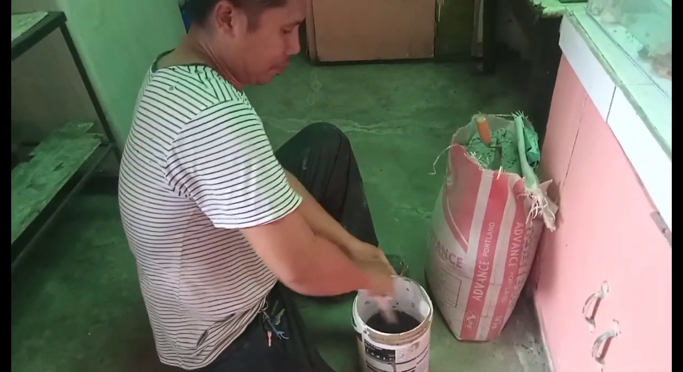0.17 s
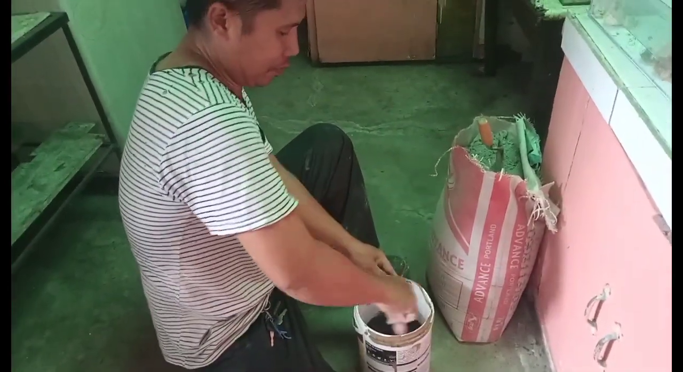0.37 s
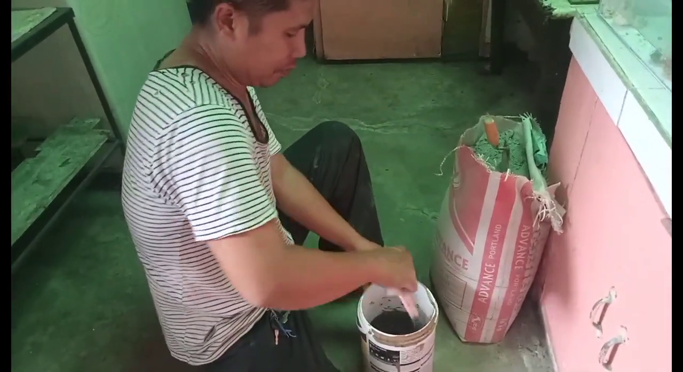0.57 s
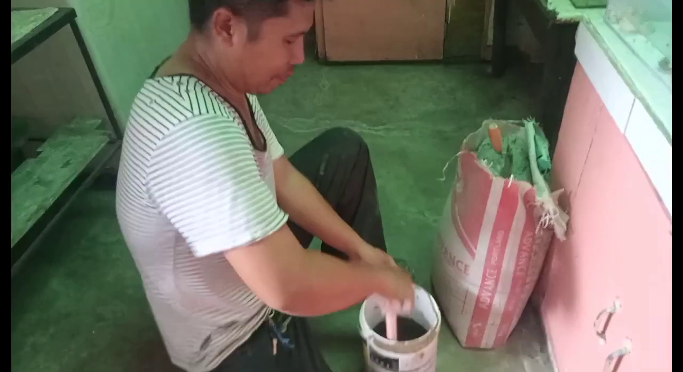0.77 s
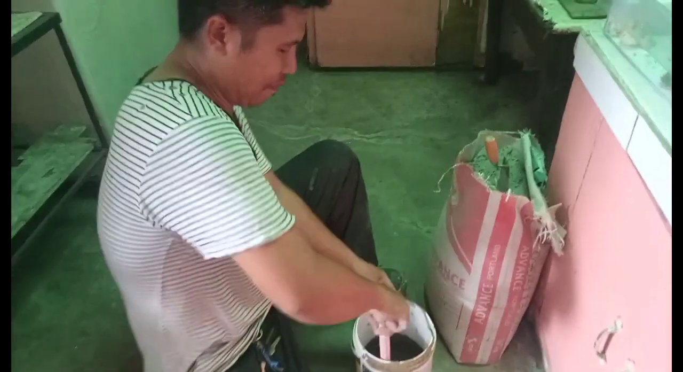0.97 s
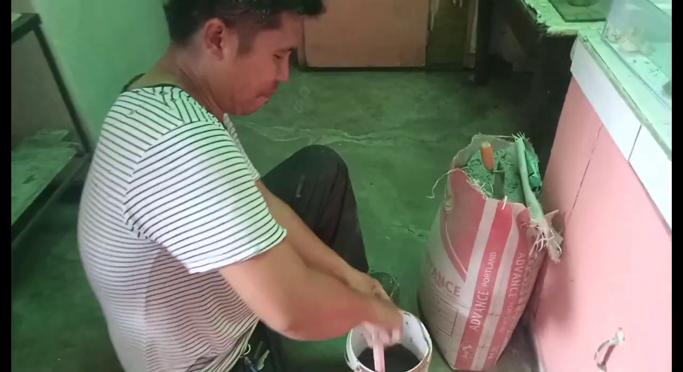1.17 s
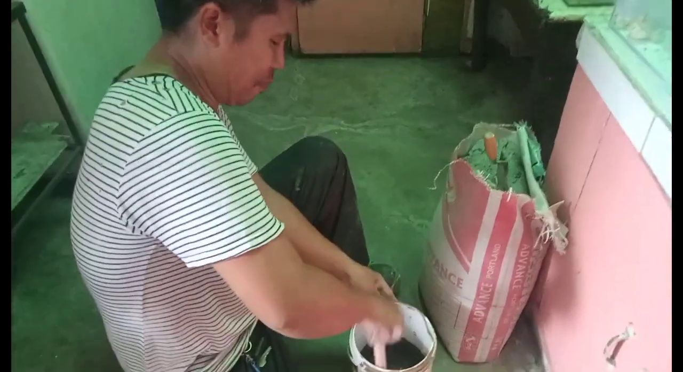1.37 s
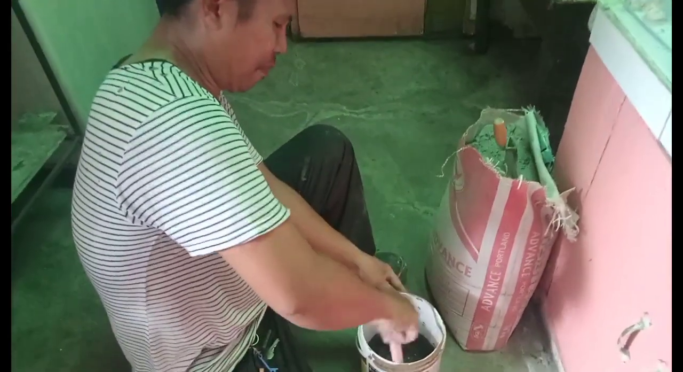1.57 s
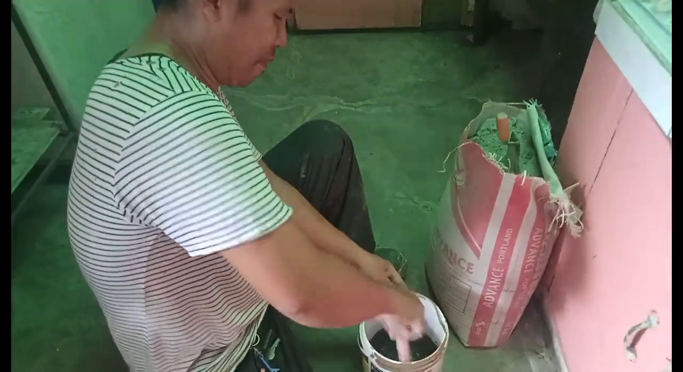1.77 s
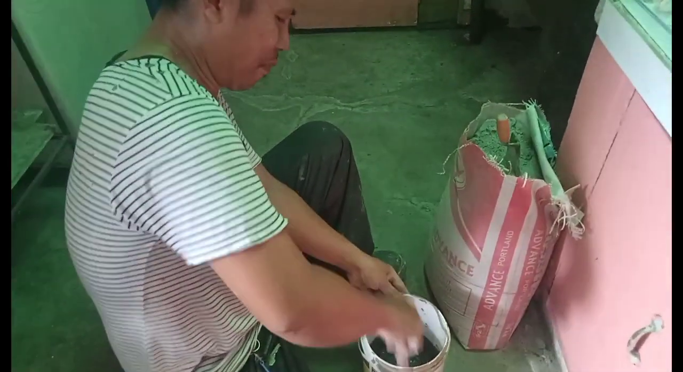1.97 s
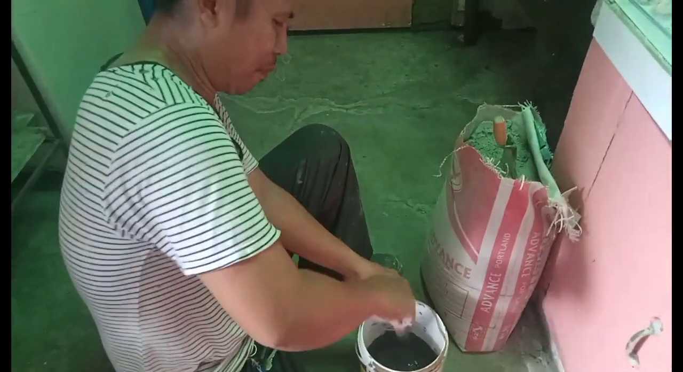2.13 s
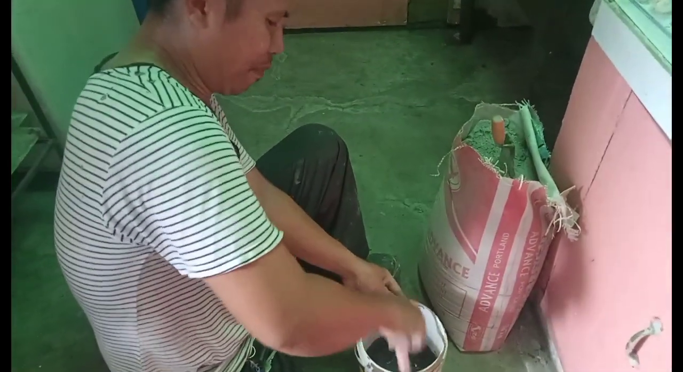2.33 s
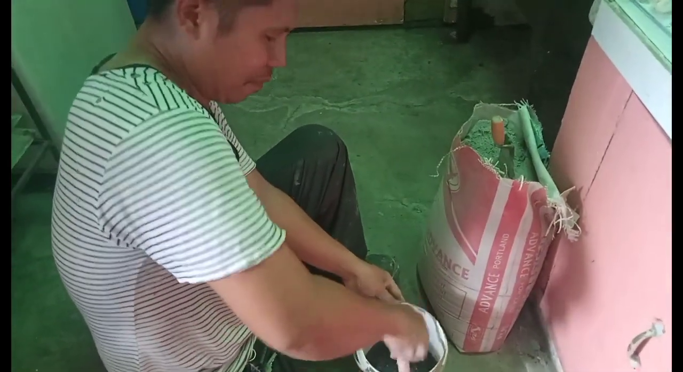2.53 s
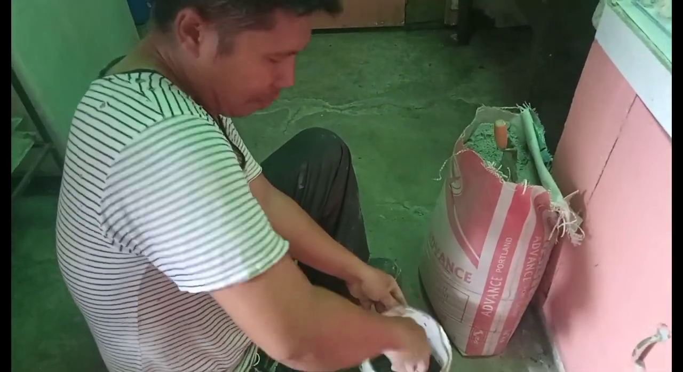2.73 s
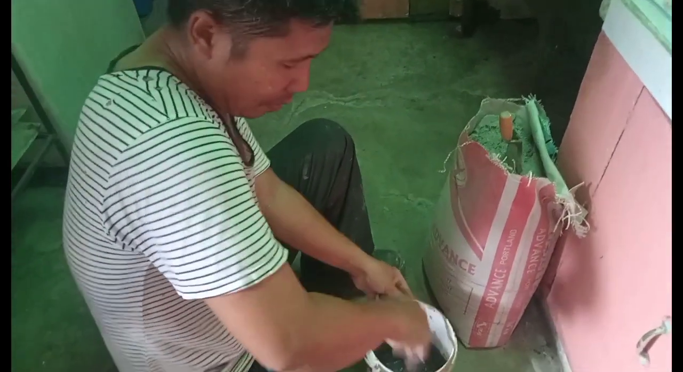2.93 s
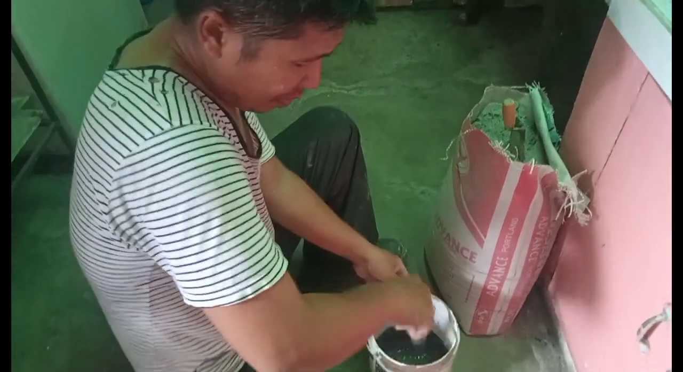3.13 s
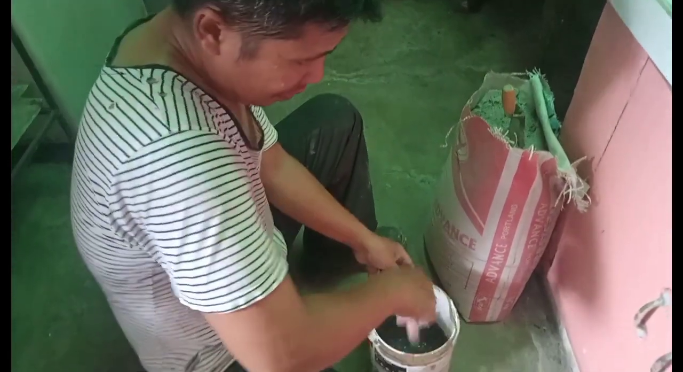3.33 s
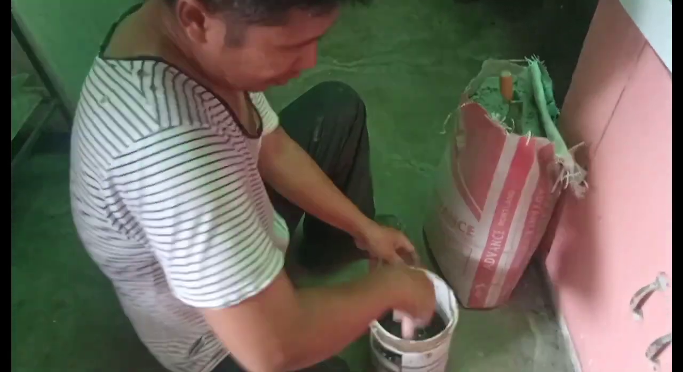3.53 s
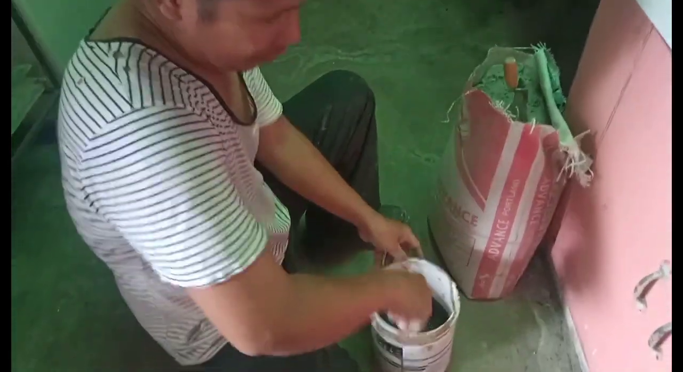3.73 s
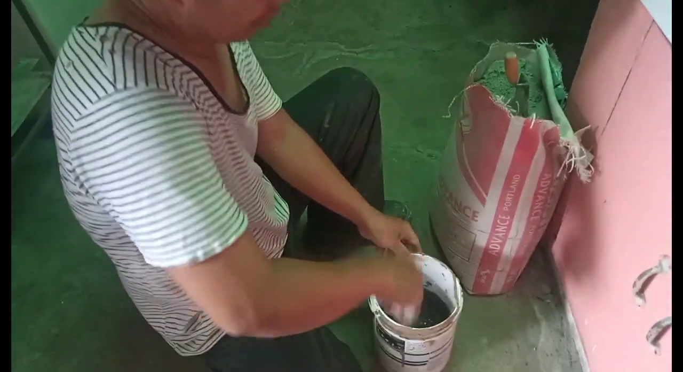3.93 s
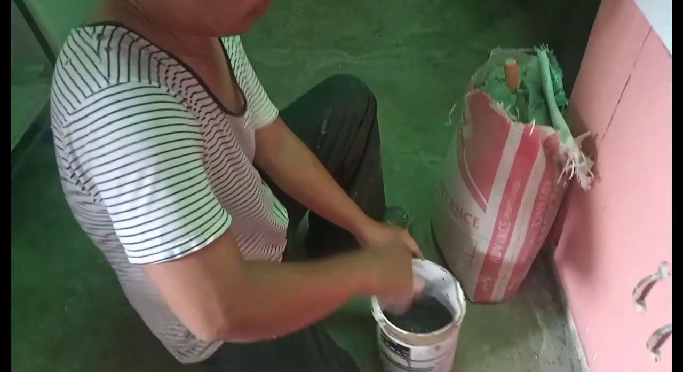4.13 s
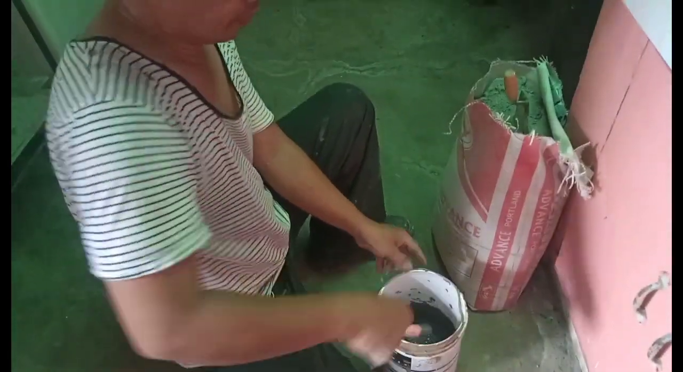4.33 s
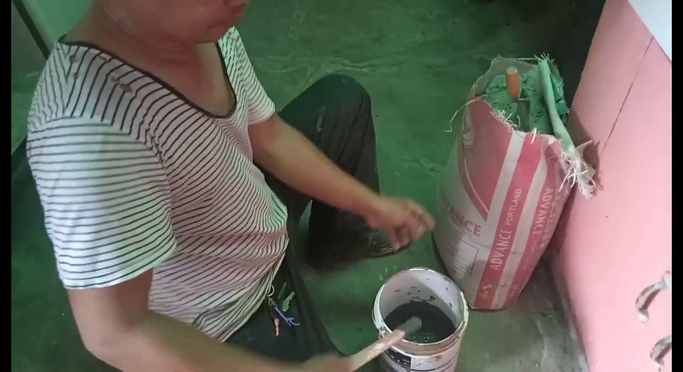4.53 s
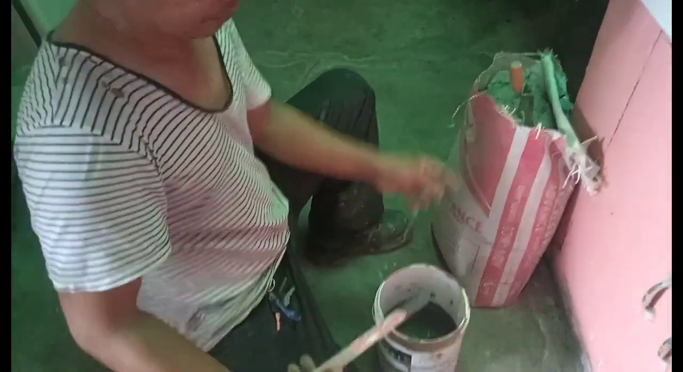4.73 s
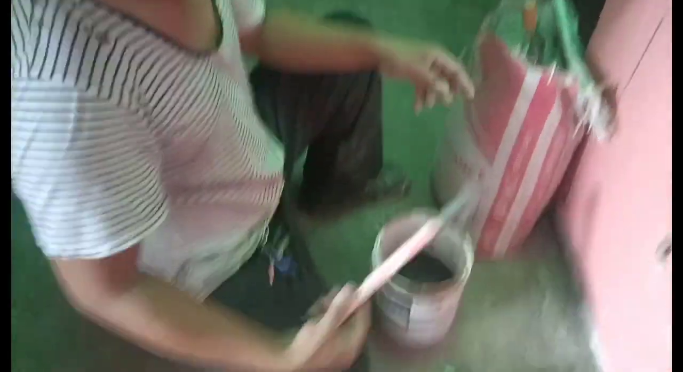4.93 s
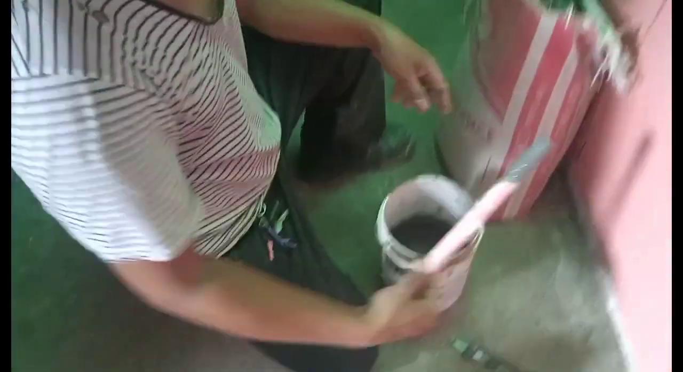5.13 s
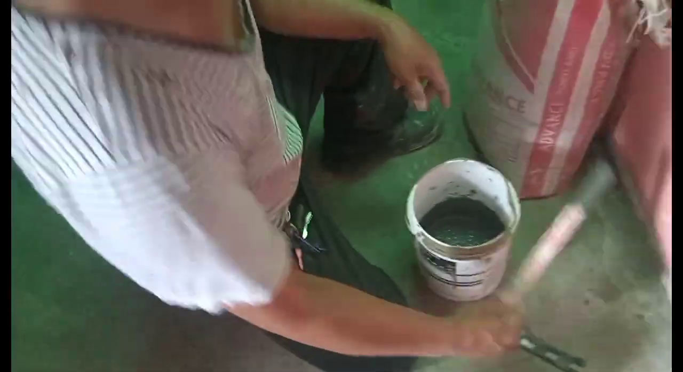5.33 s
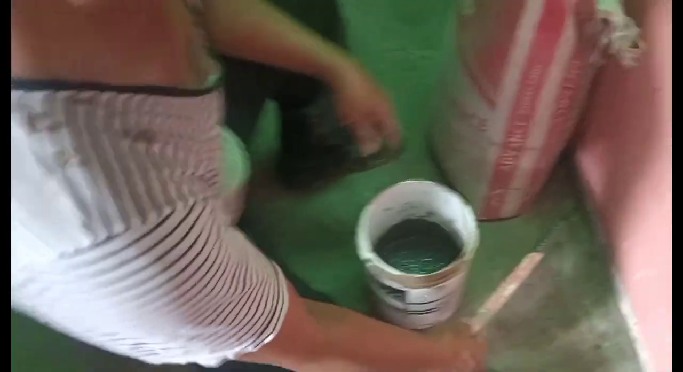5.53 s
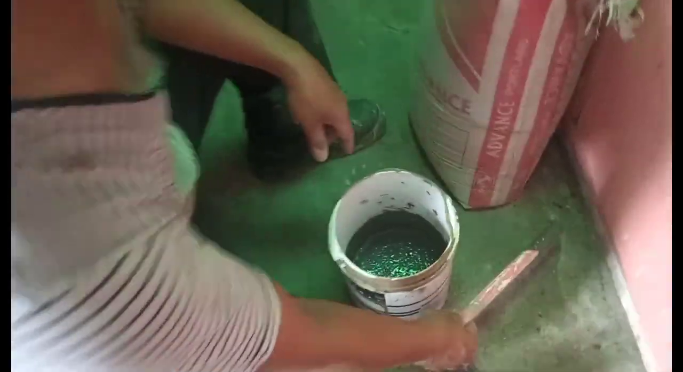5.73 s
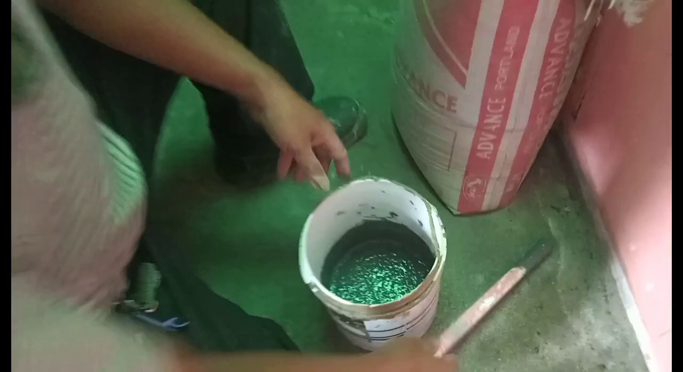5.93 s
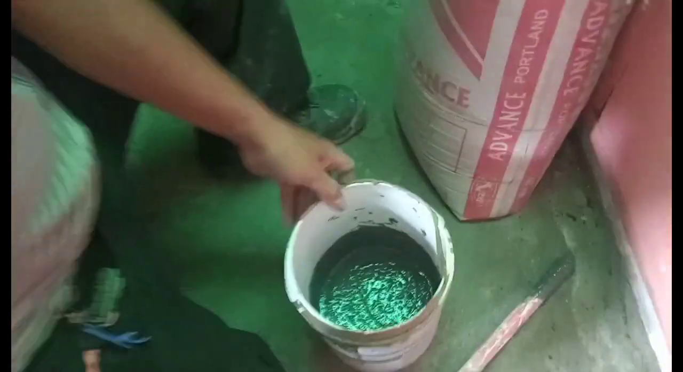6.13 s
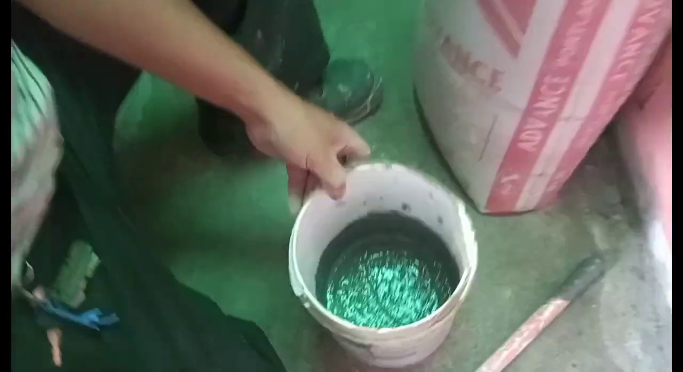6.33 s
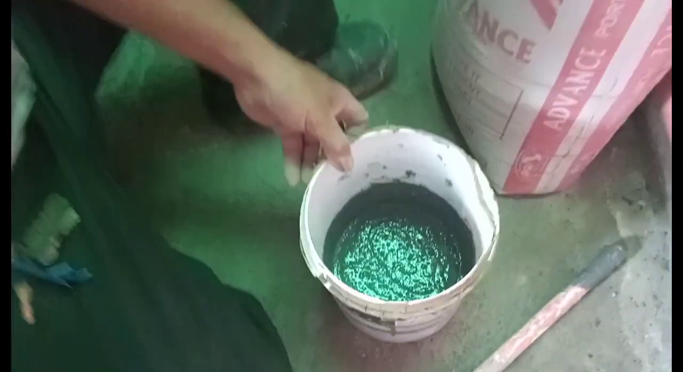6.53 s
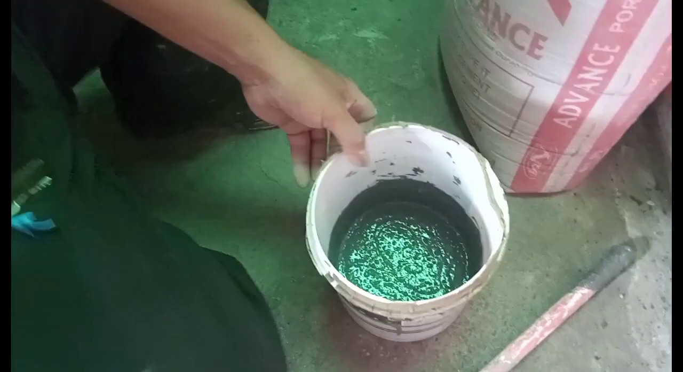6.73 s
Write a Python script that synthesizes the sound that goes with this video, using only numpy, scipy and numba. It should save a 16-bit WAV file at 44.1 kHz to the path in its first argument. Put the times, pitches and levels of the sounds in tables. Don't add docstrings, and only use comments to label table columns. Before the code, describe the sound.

A wooden stick knocks sixteen times in an even rhythm on a small plastic bucket of slurry, then is laid on concrete amid scuffs and rattles.

```python
import sys
import numpy as np
from scipy import signal
from scipy.fft import rfft, irfft
from scipy.io import wavfile
from scipy.ndimage import uniform_filter1d
from numba import njit

SR = 44100
rng = np.random.default_rng(int(sys.argv[2]) if len(sys.argv) > 2 else 0)


def boost_factor(decibels):
    exponent = np.asarray(decibels, float) / 20
    return 10 ** exponent


def put_to_file(sound):
    columns = np.atleast_2d(sound).T
    safe = np.clip(columns, -1, 1)
    whole_steps = np.round(safe * 32767)
    wavfile.write(sys.argv[1], SR, whole_steps.astype(np.int16))


N = 299439
TAIL = 16384

# (time [s], stick level [dB], lowest wall tones [dB], second wall tones [dB], upper wall tones [dB])
KNOCKS = [(0.758, -10.5, -30, -8.5, -8), (0.9911, -12, -8.5, -1.5, -13.5), (1.1857, -12, -15, -11.5, -8.5),
          (1.3877, -11, -21, -10, -7), (1.6156, -8.5, -8.5, -6, -2.5), (1.8463, -16, -10.5, -4.5, -6.5),
          (2.0556, -10, -15.5, -13, -7), (2.3008, -8.5, -18, -5.5, -3), (2.5412, -8, -15.5, -3.5, -1.5),
          (2.7731, -8, -29, -5, 0), (3.0162, -9, -14, -22.5, -3.5), (3.2521, -9.5, -32, -14, -3.5),
          (3.497, -9, -17, -13, -3.5), (3.7563, -11, -12.5, -28, -8), (4.0175, -9.5, -10.5, -9.5, -1.5),
          (4.2492, -8.5, -14, -9, -5)]
# (pitch [Hz], level [dB], time to fade by 60 dB [s])
WALL_TONES = [
    [(317.5, -7, 0.31), (325.4, -8.5, 0.43), (288, -10, 0.36), (159.5, -13.5, 0.17)],
    [(350, -6.5, 0.33), (358, 3, 0.077)],
    [(422, 4, 0.21), (483, 5.5, 0.16), (511, 0, 0.098), (586, -2.5, 0.067)],
]
# (pitch [Hz], level [dB], time to fade by 60 dB [s])
HELD_STICK_TONES = [(1220, -27.5, 0.1), (1644, 8, 0.03), (1931, 13.5, 0.044), (2205, 7, 0.12),
                    (2390, -6, 0.067), (2700, -29, 0.05), (3550, 4.5, 0.048)]
# (frequency [Hz], level [dB per Hz])
WALL_COLOUR = [(76, -68), (130, -15), (222, -17), (284, -7.5), (324, 1), (388, -7.5), (503, -6), (640, -18),
               (830, -45), (1410, -120)]
# (frequency [Hz], level [dB per Hz])
STICK_COLOUR = [(380, -36), (640, -24), (726, -7.5), (952, -7.5), (1050, -4), (1070, -11.5), (1240, -0.5),
                (1380, -10.5), (1640, 0), (1850, -7), (2130, -1.5), (2700, -14), (3510, -21), (5940, -120)]
# (frequency [Hz], level [dB per Hz])
GRIT_COLOUR = [(1590, -43.5), (2700, -2.5), (2860, -7), (3470, -5.5), (4070, -6.5), (5040, -13),
               (7330, -6.5), (11100, -29), (14800, -25), (15600, -24)]


def knocks():
    out, wall = np.zeros(N), np.zeros(N)
    soft = swell(0.0033)
    for s, stick_db, *wall_db in KNOCKS:
        crack_db = min(-9.5 - 0.19 * (wall_db[1] - stick_db), -9)
        for tones, db, trim_db in zip(WALL_TONES, wall_db, (4.0, 2.5, -3.0)):
            add(wall, s, boost_factor(db + trim_db) * soft * ring(tones, chance(tones)))

        stick_tilt = 1.1 * min(crack_db + 9.0, 0)
        stick_tones = [(hz, db + stick_tilt * np.log2(hz / 1500), t60) for hz, db, t60 in HELD_STICK_TONES]
        add(out, s, boost_factor(stick_db + 4.0) * np.sqrt(soft) * ring(stick_tones, chance(stick_tones)))
        add(out, s, boost_factor(stick_db + crack_db + 11) * burst(GRIT_COLOUR, 0.0019))

        noise = rng.standard_normal(TAIL)
        boom = boost_factor(wall_db[-1] - 13.0) * colour(noise, WALL_COLOUR)
        blow_tilt = 2.8 * (crack_db + 10.0)
        blow_colour = [(hz, db + blow_tilt * np.log2(hz / 1500)) for hz, db in STICK_COLOUR]
        clack = boost_factor(stick_db - 8.5) * colour(noise, blow_colour)
        crack = boost_factor(stick_db + crack_db - 7) * colour(noise, GRIT_COLOUR)
        add(out, s, echoes(boom + clack + crack, onset_s=0.0018))
    slosh_db = 3.5 * walk(28)
    return out + wall * boost_factor(slosh_db)


def scrape():
    t, push = np.arange(N) / SR, 0
    for s, stick_db, *_ in KNOCKS:
        age = np.maximum(t - s, 0)
        push = push + boost_factor(stick_db - 35) * (1 - np.exp(-age / 0.05)) * np.exp(-age / 0.095)
    grit = rng.standard_normal(N) * boost_factor(2.8 * rng.exponential(size=N) + 3.0 * walk(55))
    return push * colour(grit, GRIT_COLOUR)


# (time [s], level [dB])
LANDINGS = [
    (5.9424, 2),
    (5.956, -6),
]
# (pitch [Hz], level [dB], time to fade by 60 dB [s])
FREE_STICK_TONES = [(1340, -9, 0.041), (1790, -2.5, 0.067), (2130, -12, 0.034), (2720, 1, 0.0097),
                    (4200, 6, 0.019), (4700, 3, 0.017), (7340, 1, 0.019)]
# (frequency [Hz], level [dB per Hz])
LANDING_COLOUR = [(240, -45), (400, -18), (519, -17), (569, -17), (634, -23), (874, -10.5), (1100, -22),
                  (1280, -8), (2600, -2), (2890, -11), (7470, -14.5), (10200, -36), (15600, -33)]


def drop():
    out = np.zeros(N)
    for s, db in LANDINGS:
        add(out, s, boost_factor(db - 0.5) * ring(FREE_STICK_TONES, chance(FREE_STICK_TONES)))
        add(out, s, boost_factor(db - 3.5) * burst([(400, -19), (2000, 8), (8000, -9), (15000, -20)], 0.0018))
        noise = colour(rng.standard_normal(TAIL), LANDING_COLOUR)
        add(out, s, boost_factor(db - 22) * echoes(noise, onset_s=0.0057))
    return out


# (time [s], level [dB], pitch [Hz], time to fade by 60 dB [s], upper tones minus level [dB])
THUDS = [
    (0.843, -14, 325, 0.072, -13),
    (4.377, -15.5, 335, 0.045, -9),
    (4.408, -24, 333.8, 0.25, -10.5),
    (6.09, -31, 258, 0.035, -14),
    (6.469, -33.5, 350, 0.096, -1.5),
    (6.536, -29.5, 350, 0.13, -14),
    (6.727, -19.5, 248, 0.032, -36),
    (6.745, -11, 264, 0.027, -34),
    (6.757, -26, 250, 0.14, -20),
]


def thuds():
    out, still, soft = np.zeros(N), np.zeros((1, 2)), swell(0.0016)
    for s, db, hz, t60, upper_db in THUDS:
        upper = boost_factor(upper_db) * ring(WALL_TONES[-1], chance(WALL_TONES[-1]))
        add(out, s, boost_factor(db + 6.5) * (ring([(hz, 0, t60)], still) + upper) * soft)
    return out


# (time [s], level [dB], pitch [Hz], treble minus level [dB])
TICKS = [(0.952, -37, 3700, -15), (1.139, -39, 3800, -19), (1.341, -31.5, 3060, -16),
         (1.5493, -31, 3720, -13.5), (2.021, -35, 7190, -9), (2.222, -31.5, 3860, -22),
         (2.488, -28.5, 3080, -15.5), (2.737, -47, 3800, -6), (3.205, -32, 3720, -15),
         (4.205, -30.5, 3660, -17.5), (4.296, -22, 3060, -19), (4.308, -21, 3380, -16),
         (4.362, -26, 3370, -22), (4.5278, -37, 7100, -11), (5.262, -31.5, 1490, -32),
         (5.349, -34, 3870, -20), (5.751, -55, 7300, -9), (5.868, -57, 7200, -6), (5.9, -50, 3600, -12),
         (6.086, -16, 4340, -13.5), (6.118, -20, 7480, -5.5), (6.126, -28, 3900, -13),
         (6.1572, -21.5, 7700, 0.5), (6.1969, -20.5, 7300, -8.5), (6.261, -26, 7250, -19),
         (6.464, -36, 3340, -22), (6.5066, -40.5, 3260, -5), (6.5321, -42, 3400, -11),
         (6.6257, -19, 3680, -30), (6.7305, -15, 3550, -28)]
# (frequency [Hz], level [dB per Hz])
RATTLE_COLOUR = [(500, -29), (1200, -13), (2600, -11.5), (4000, -1), (5500, -10), (7500, 0), (10000, -14.5),
                 (14500, -11), (15600, -12)]


def ticks():
    out, length_s = np.zeros(N), 0.0055
    for s, db, hz, top_db in TICKS:
        pitched = [(hz / 1.8, -25), (hz / 1.1, -3), (hz, 0), (hz * 1.3, -4), (hz * 1.29, -14)]
        add(out, s, boost_factor(db - 3.5) * burst(pitched, length_s))
        add(out, s, boost_factor(db + top_db + 11.5) * burst(RATTLE_COLOUR, length_s))
        add(out, s, boost_factor(db - 11) * burst(STICK_COLOUR, length_s))
    return out


# (start time [s], hold [s], level [dB], treble minus level [dB])
DRAGS = [
    [(0.06, 0.11, -59.5, -7), (0.535, 0.022, -47.5, -19), (0.628, 0.25, -48.5, -10)],
    [(5.146, 0.046, -43, -11)],
    [(5.33, 0.022, -51, -21), (5.355, .19, -28, -15.5)],
    [(6.475, 0.074, -41.5, -34), (6.625, 0.031, -37.5, -12.5), (6.745, .06, -32, -12.5)],
]
# (frequency [Hz], level [dB per Hz])
DRAG_COLOURS = [
    [(530, -42), (900, -7), (1030, -24), (1350, -8), (2180, -8), (3250, -8), (5000, -25), (6500, -61),
     (11000, -120)],
    [(710, -57), (1200, -22), (1770, -7), (1840, -8), (2370, 4), (2850, -7), (5000, -21), (6500, -48),
     (11000, -120)],
    [(290, -27), (500, -15), (661, -20), (841, -12), (1030, -16.5), (1120, -14.5), (1570, 0.5), (1750, -7),
     (1980, 1), (2360, -7.5), (3120, -9), (5000, -24), (6500, -67), (11000, -120)],
    [(290, -35), (500, -10.5), (674, -15), (779, -3), (917, -12.5), (1240, -4), (1570, -11), (2750, -5),
     (3890, -21.5), (5000, -29), (6500, -36), (11000, -120)],
]
# (frequency [Hz], level [dB per Hz])
DRAG_TREBLE = [(2650, -4), (4500, -10.5), (5630, -5.5), (6750, -6), (7380, -0.5), (10300, -22),
               (14900, -13.5), (15600, -17)]


def scuffs():
    rise, sag, fall = 906, 11, 208
    grit = rng.standard_normal(N) * boost_factor(1.7 * rng.exponential(size=N) + 1.7 * walk(78))
    top, out, t = colour(grit, DRAG_TREBLE), np.zeros(N), np.arange(N) / SR
    for drags, points in zip(DRAGS, DRAG_COLOURS):
        body = colour(grit, points)
        for s, hold, db, top_db in drags:
            age = t - s
            shape_db = rise * np.minimum(age, 0) - sag * np.clip(age, 0, hold) - fall * np.maximum(age - hold, 0)
            out += boost_factor(db + 1.5 + shape_db) * (body + boost_factor(top_db) * top)
    return out


# (time [s], level [dB], bright part minus level [dB], length [s])
TAPS = [
    (4.845, -33, -3, 0.0019),
    (4.872, -36, -3.5, 0.004),
    (4.977, -11.5, -10.5, 0.002),
]


def taps():
    out = np.zeros(N)
    for s, db, bright_db, length_s in TAPS:
        add(out, s, boost_factor(db + 3) * ring([(410, 12, 0.012), (730, -11, 0.018)], np.zeros((2, 2))))
        bright = burst([(700, 2.5), (2000, 1), (6000, -17.0), (15000, -35)], length_s)
        add(out, s, boost_factor(db + bright_db + 4.5) * bright)
    return out


# (time [s], level [dB])
RUMBLE_LEVEL = [(0.0, -46), (0.64, -50), (0.9, -43.5), (2.25, -45), (2.55, -53.5), (3.1, -45), (4.3, -45.5),
                (4.6, -42.5), (5.1, -42.5), (5.45, -40), (6.45, -40), (6.79, -41)]
# (frequency [Hz], level [dB per Hz])
RUMBLE_COLOUR = [(15, -72.5), (25, -40), (81, -1), (118, -3.5), (139, -4.5), (190, -5), (227, -15),
                 (257, -8), (300, -28), (390, -65), (660, -120)]


def rumble():
    (level_db,) = curve(RUMBLE_LEVEL)
    return boost_factor(level_db - 0.6 + 0.33 * walk(5.3)) * colour(rng.standard_normal(N), RUMBLE_COLOUR)


# (frequency [Hz], level [dB per Hz])
HISS_COLOUR = [(180, -21.5), (300, 0), (560, -8.5), (835, -11.5), (1180, -10.5), (1620, -8), (2740, -11),
               (3230, -15.5), (3750, -17.5), (5200, -33), (7300, -27.5), (9000, -44), (15500, -50)]


def hiss():
    return boost_factor(-48 + 0.23 * walk(16.0)) * colour(rng.standard_normal(N), HISS_COLOUR)


def drone():
    hz, width_hz = 150, 5.3
    line = [(hz - 2 * width_hz, -20), (hz, 0), (hz + 2 * width_hz, -20)]
    swelling = np.interp(np.arange(N) / SR, (5.05, 6.45, 6.65), [.3, 1, .6], left=0, right=0)
    return boost_factor(-39.5) * swelling * colour(rng.standard_normal(N), line)


def whine():
    t = np.arange(N) / SR
    return boost_factor(-51) * np.interp(t, [0.45, 0.78], [1, 0]) * np.sin(2 * np.pi * 3137 * t)


# (time [s], pitch [Hz], level [dB])
SQUEAL = [(4.82, 12800, -88), (4.84, 13300, -71), (4.875, 13800, -76), (4.9, 13550, -73),
          (4.99, 13450, -74), (5.05, 12050, -84), (5.13, 11900, -84), (5.15, 11900, -99)]


def squeal():
    hz, db = curve(SQUEAL)
    started = np.arange(N) / SR > SQUEAL[0][0]
    return boost_factor(db + 2.5 * walk(60)) * np.sin(2 * np.pi * np.cumsum(hz) / SR) * started


# (frequency [Hz], time to fade by 60 dB [s])
ROOM_T60 = [(150, 0.45), (400, 0.45), (1000, 0.47), (2500, 0.42), (6000, 0.35), (13000, 0.26)]


def echoes(noise, onset_s):
    t, spectrum, tail = np.arange(len(noise)) / SR, rfft(noise), 0
    log_f = np.log(np.maximum(np.arange(len(spectrum)) * SR / len(noise), 1))
    hz, t60s = np.transpose(ROOM_T60)
    for share, t60 in zip(np.eye(len(hz)), t60s):
        band = irfft(spectrum * np.interp(log_f, np.log(hz), share), len(noise))
        tail = tail + band * np.exp(-np.log(1000) * t / t60)
    early_db = 7.0 * np.exp(-t / 0.023)
    return tail * (1 - np.exp(-t / onset_s)) * boost_factor(early_db)


def room(thud, tick):
    tail = echoes(rng.standard_normal(TAIL), onset_s=0.0027)
    sent = boost_factor(-5.0) * thud + boost_factor(-3) * tick
    return thud + tick + signal.fftconvolve(sent, tail / np.sqrt(np.sum(tail ** 2)))[:N]


def colour(x, points):
    hz, db = np.transpose(points)
    f = np.maximum(np.arange(len(x) // 2 + 1) * SR / len(x), 1)
    gain = boost_factor(np.interp(np.log(f), np.log(hz), db, left=-80, right=-80))
    y = irfft(rfft(x) * gain, len(x))
    return y / np.sqrt(np.mean(y ** 2))


def swell(time_s):
    return 1 - np.exp(-np.arange(TAIL) / SR / time_s)


def chance(tones):
    return rng.standard_normal((len(tones), 2))


def ring(tones, shifts):
    t, y = np.arange(TAIL) / SR, 0
    for (hz, db, t60), (level, pitch) in zip(tones, shifts):
        tone = np.sin(2 * np.pi * hz * (1 + 0.012 * pitch) * t)
        y = y + boost_factor(db + 5.5 * level) * tone * np.exp(-np.log(1000) * t / t60)
    return y / np.abs(y).max()


def burst(points, decay_s):
    t = np.arange(4096) / SR / decay_s
    return colour(rng.standard_normal(len(t)), points) * np.exp(-t) * (1 - np.exp(-t / 0.41))


def add(out, s, x):
    i = int(s * SR)
    out[i:i + len(x)] += x[:N - i]


def curve(table):
    s, *columns = np.transpose(table)
    return [np.interp(np.arange(N) / SR, s, c) for c in columns]


def walk(rate):
    k = int(SR / rate)
    steps = np.repeat(rng.standard_normal(N // k + 1), k)
    return 1.25 * uniform_filter1d(uniform_filter1d(steps, k), k)[:N]


def scene():
    near = knocks() + room(thuds(), ticks()) + drop() + taps()
    near = signal.sosfilt(signal.butter(3, 130, "high", fs=SR, output="sos"), near)
    background = rumble() + hiss() + drone() + whine() + squeal()
    return (near + scrape() + scuffs() + background)[None]


@njit
def follow(x, attack, release):
    e, out = 0., np.empty(len(x))
    for i in range(len(x)):
        e += (abs(x[i]) - e) * (attack if abs(x[i]) > e else release)
        out[i] = e
    return out


def band_limit(x):
    return signal.sosfilt(signal.butter(12, 16820, fs=SR, output="sos"), x)


def record(dry):
    level = follow(dry[0], 0.024, 1 / (0.061 * SR))
    x = dry * np.minimum(1, 0.26 / (level + 1e-9)) ** 0.15
    x = np.tanh(0.98 * x) / 1.09
    x = signal.sosfilt(signal.ellip(8, .2, 40, 15600, fs=SR, output="sos"), x)
    return band_limit(x)


dry = scene()
out = record(dry)
put_to_file(out)
```